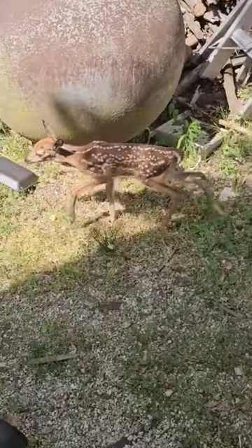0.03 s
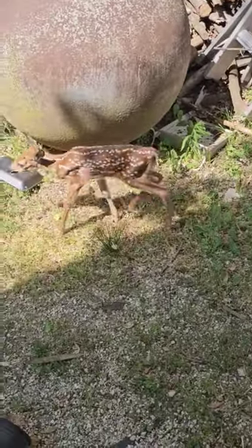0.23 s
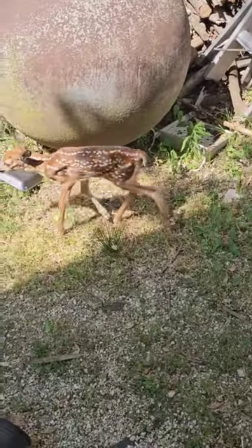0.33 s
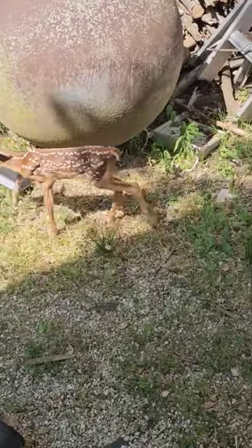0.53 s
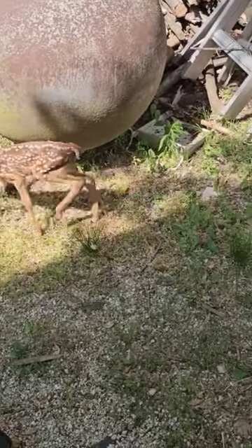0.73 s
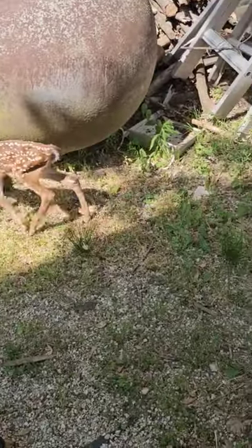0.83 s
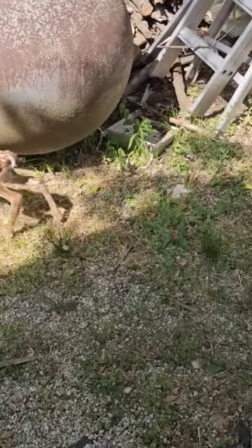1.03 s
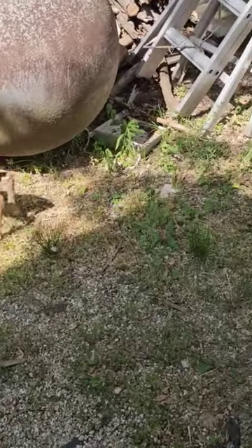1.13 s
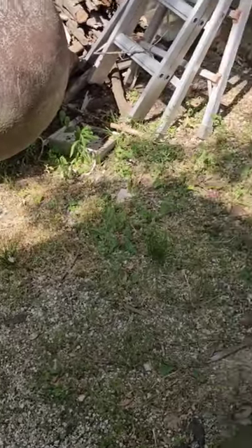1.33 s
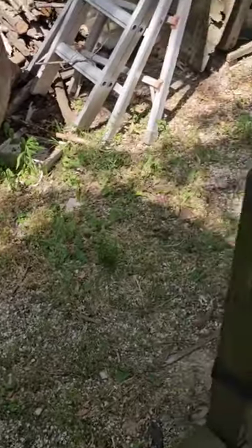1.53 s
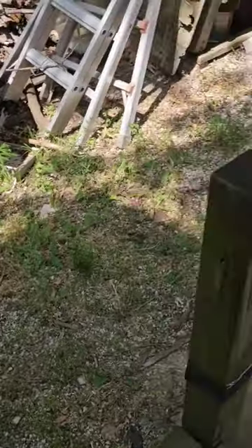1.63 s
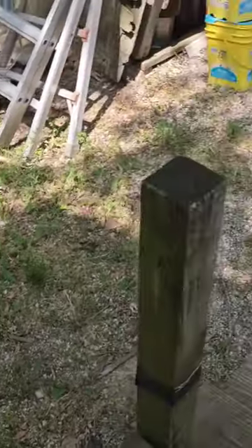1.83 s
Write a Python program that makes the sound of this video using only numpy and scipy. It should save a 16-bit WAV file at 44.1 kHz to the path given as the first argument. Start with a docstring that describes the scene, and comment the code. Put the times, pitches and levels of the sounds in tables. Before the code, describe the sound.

A fawn gives one short, high bleat in a yard, then soft bumps on the camera.

```python
"""A fawn bleats once, walking past in a yard: an arched call opening from a closed-mouth hum, made of
sine overtones and breath noise, with an echo from sheds and a tank. Close by, handling bumps on the camera
(decaying tones, short bright noise snaps) and grass brushed by feet (grainy noise swells). Farther off,
filtered noise makes rumble, air and a thin insect that fades out; gliding sines make faint bird notes.
The left microphone is mostly fuller below 2 kHz, the right brighter."""
import sys
import numpy as np
from scipy import signal
from scipy.fft import rfft, irfft, next_fast_len
from scipy.io import wavfile
from scipy.ndimage import uniform_filter1d, map_coordinates

SR = 44100
rng = np.random.default_rng(int(sys.argv[2]) if len(sys.argv) > 2 else 0)


def to_wav(s):
    """Save 16-bit WAV."""
    ch = np.atleast_2d(s).T  # columns
    pcm = np.round(np.clip(ch, -1, 1) * 32767)  # PCM
    wavfile.write(sys.argv[1], SR, pcm.astype(np.int16))


N = 83790
T = np.arange(N) / SR  # s

# Still air and distant rumble, before patchiness: f/Hz, left level/(dB per Hz), right level/(dB per Hz)
AIR_SPECTRUM = [(15, -65, -87.5), (40, -62, -66), (85.9, -63, -67), (121, -70, -84), (227, -84.5, -78),
                (305, -83, -87), (400, -99.5, -96), (560, -87, -97), (1450, -90.5, -100),
                (2200, -97.5, -100), (2960, -102.5, -102), (5700, -104, -100), (6760, -108, -102),
                (7870, -120, -116), (10300, -122, -118), (11330, -111, -108), (15700, -119, -116)]
# Left-right likeness of the air: f/Hz, likeness/(0 to 1)
AIR_LIKENESS = [(60, 0.92), (110, 1), (200, 0.86), (380, 0.25), (700, 0), (15000, 0)]
AIR_PATCHY_DB = 2.42
INSECT_HZ, INSECT_HALF_WIDTH_HZ, INSECT_FADES_S = 5352, 83, 0.91
INSECT_DB, INSECT_RIGHT_DB = -69.5, 12.5  # the second is the right channel's extra
# Faint far bird notes: t/s, length/s, start f/Hz, end f/Hz, level/dB
BIRD_NOTES = [(1.094, 0.084, 2170, 2104, -64), (1.264, 0.029, 2120, 2050, -62.5)]

# Course of the bleat: t/s, pitch f/Hz, effort level/dB, mouth opening level/dB
BLEAT_COURSE = [(0.156, 385, -55, -38), (.178, 427.3, -12, -52), (0.192, 476, -22.5, -35),
                (0.207, 538, -13, -7), (0.222, 559, -7, -10), (.232, 577.3, -1.5, 0),
                (0.251, 585.6, -7, 3.5), (0.279, 603, -1.5, 4), (0.312, 614.1, -0.5, 3),
                (0.348, 605, 2, -4.5), (0.372, 612.4, -3, 3), (0.412, 600.6, 0, -3.5),
                (0.44, 601.7, -8, 0.5), (.462, 577.7, -6.5, 0.5), (0.476, 563, -14, 0.5),
                (0.494, 536, -10.5, -13), (0.519, 488, -16.5, -18), (0.535, 446, -21.5, -4),
                (.55, 423, -48, -4)]
# Overtone strength early in the call: f/Hz, left level/dB, right level/dB
EARLY_OVERTONES = [(603, -43, -52.5), (870, -42, -38.5), (1190, -35.5, -39), (1370, -44, -47.5),
                   (1830, -50, -42), (2710, -49, -42), (2962, -35.5, -27), (3240, -47, -45.5),
                   (4120, -48.5, -34.5), (4730, -38.5, -20), (5520, -37, -29), (5473, -80.5, -25),
                   (6800, -53.5, -44.5), (7230, -53.5, -38), (7780, -57, -53.5), (8800, -70.5, -103),
                   (11550, -81, -56), (15500, -76, -100)]
# Overtone strength late in the call: f/Hz, left level/dB, right level/dB
LATE_OVERTONES = [(610, -47.5, -54), (1210, -48, -35), (1940, -49.5, -44), (2570, -52.5, -41),
                  (2970, -49.5, -38.5), (3370, -28, -24.5), (3954, -34.5, -34), (4730, -36.5, -15.5),
                  (5730, -34.5, -25.5), (6210, -43, -28.5), (6516, -57, -31), (7460, -52.5, -53),
                  (7950, -68.5, -58.5), (9600, -67, -101), (11440, -70, -56), (15500, -73, -86)]
SHIFT_S, SHIFT_TAKES_S = 0.32, 0.0358  # from the early balance to the late one
# late in the call a hollow opens in the middle overtones on the right
HOLLOW_S, HOLLOW_HZ, HOLLOW_WIDE_HZ, HOLLOW_DB = .39, 2500, 750, -9
LEFT_LATE_S = .00009  # the call reaches the right microphone first
MOUTH_OPEN_HZ = 2910  # the mouth opening acts above this
WAVER_DB = 1.5  # overtone drift, growing with overtone number
TREMBLE, TREMBLE_END = 0.002, .009  # share of pitch: throughout, and added as the call dies
# Relative spectrum of the breath under the overtones: f/Hz, left level/dB, right level/dB
BREATH_SPECTRUM = [(589, -47, -59), (2700, -46.5, -45.5), (3600, -8, -18), (4870, -11.5, 5.5),
                   (5900, -15.5, 0), (8700, -45, -41), (11800, -14.5, -9.5), (15500, -27, -25.5)]
BREATH_DB, BREATH_END_DB, DIES_S = -56, 27, .482  # the second is added as the call dies

# Echo decay in the yard: f/Hz, t60/s
YARD_DECAY = [(1200, .12), (3000, .27), (4800, .21), (6200, .3), (12000, .15)]
YARD_DB, YARD_DELAY_S = -13, .03
ECHO_FLUTTER_DB = 5  # fast random level flutter makes the echo hazy

# Low thumps of handling bumps on the camera: t/s, strength level/dB, pitch f/Hz, t60/s
BUMP_THUMPS = [(.205, -35, 62.5, 0.17), (.398, -28.5, 65, 0.071), (0.959, -35.5, 82, 0.045),
               (1.147, -23, 96.7, 0.059), (1.442, -36.5, 110, 0.037), (1.529, -26.5, 93, 0.086),
               (1.552, -31.5, 91.5, 0.031), (1.607, -29.5, 54.8, 0.13), (1.774, -36.5, 56, 0.069)]
THUMP_LEFT_DB, THUMP_RIGHT_DB, THUMP_RISE_S = 8.5, 0.5, 0.001
# Case knocks and bright snaps: t/s, case flex level/dB, case knock level/dB, snap level/dB, snap treble level/dB
KNOCKS_AND_SNAPS = [(0.353, -57, -45.5, -49, -6), (0.956, -35, -28, -39.5, 2), (1.143, -29, -67, -63, 0),
                    (1.44, -35, -31, -30.5, -7.5), (1.528, -29.5, -28, -48, -2.5),
                    (1.5552, -37, -32.5, -39.5, 8), (1.596, -37, -64, -70, 2)]
# Case flex, then two knock modes: f/Hz, t60/s, left level/dB, right level/dB, right phase lead/rad
CASE_MODES = [(228.6, 0.04, 11, 4, 4.31), (505, .016, 3, 0, 2.03), (693, 0.013, 10, -10, 1.3)]
# Relative spectrum of a snap: f/Hz, left level/dB, right level/dB
SNAP_SPECTRUM = [(500, -34.5, -23), (1100, -6, -24), (1750, -1.5, -20.5), (3120, -9.5, -22.5),
                 (4400, -9, 0), (6550, -20.5, -10.5), (9200, -35.5, -40), (12000, -40.5, -31.5),
                 (15500, -31, -39)]
SNAP_T60_S, SNAP_LATE_S, CASE_RISE_CYCLES = .009, .0005, .8

# Grass brushed by feet: t/s, length/s, level/dB, dull scuff level relative to the bright part/dB
GRASS_BRUSHES = [(0.506, 0.033, -52, -9), (0.736, 0.017, -63, -12), (0.96, 0.08, -62.5, 2),
                 (1.168, 0.046, -63, -5), (1.278, 0.041, -55.5, -28), (1.408, 0.034, -61.5, -13),
                 (1.536, 0.11, -63, 8.5), (1.696, 0.096, -59, 7.5), (1.861, 0.028, -56, -4)]
# Relative spectrum of bright grass: f/Hz, left level/dB, right level/dB
GRASS_SPECTRUM = [(200, -120, -120), (1466, 11, -44), (4107, -0.5, 6), (6460, -6.5, 10), (9250, -26, -33),
                  (11780, -6, 4), (15480, -4.5, -29)]
# Relative spectrum of the dull scuff: f/Hz, left level/dB, right level/dB
SCUFF_SPECTRUM = [(59.7, -23, -38.5), (199, 5, -3), (738.5, 2, -12), (1500, -9.5, -20),
                  (3020, -16.5, -37.5), (6030, -120, -120)]
BAND_LIMIT_HZ = 15440


def amp(db):
    """Decibels to amplitude."""
    return 10 ** (np.asarray(db) / 20)


def unit(x):
    """Scale to an RMS of one across all channels."""
    return x / np.sqrt(np.mean(x ** 2) + 1e-20)


def along(points, hz):
    """Each column after f/Hz, read on a log frequency axis."""
    f, *cols = np.transpose(points)
    return np.array([np.interp(np.log(hz + 1), np.log(f + 1), c) for c in cols])


def wobble(rate):
    """A smooth random curve with rate knots a second."""
    return map_coordinates(rng.standard_normal(int(N * rate / SR) + 4), [T * rate])


def filtered(x, response):
    """Multiply the spectrum of x by a response of frequency."""
    m = next_fast_len(N + SR // 2)
    return irfft(rfft(x, m) * response(np.fft.rfftfreq(m, 1 / SR)), m)[..., :N]


def coloured(spectrum):
    """Unrelated noise in the two channels, shaped by a spectrum."""
    return filtered(rng.standard_normal((2, N)), lambda hz: amp(along(spectrum, hz)))


def since(s):
    """Seconds since s, zero before it."""
    return np.maximum(T - s, 0)


def sigmoid(x):
    """A smooth step from 0 to 1."""
    return 1 / (1 + np.exp(-x))


def air():
    """Patchy background noise: rumble shared by both microphones, treble unrelated."""
    z = signal.stft(rng.standard_normal((2, N)), nperseg=512)[2]
    patches = uniform_filter1d(rng.standard_normal(z.shape[1:]), size=6, axis=0)
    patches = uniform_filter1d(patches, size=12, axis=1)
    left, other = signal.istft(z * amp(AIR_PATCHY_DB * unit(patches)), nperseg=512)[1][:, :N]

    def likeness(hz):
        return np.clip(along(AIR_LIKENESS, hz)[0], 0, 1)

    right = filtered(left, likeness) + filtered(other, lambda hz: np.sqrt(1 - likeness(hz) ** 2))
    # per-Hz levels to white noise of unit power
    return filtered(np.array([left, right]), lambda hz: amp(along(AIR_SPECTRUM, hz)) * np.sqrt(SR / 2))


def insect():
    """A thin noise band around one pitch, gently wavering until it fades out."""
    band = filtered(rng.standard_normal((2, N)),
                    lambda hz: 1 / (1 + ((hz - INSECT_HZ) / INSECT_HALF_WIDTH_HZ) ** 2))
    fade = sigmoid((INSECT_FADES_S - T) / 0.053)
    level_db = INSECT_DB + 1.4 * wobble(40.11) + [[0], [INSECT_RIGHT_DB]]
    return amp(level_db) * fade * unit(band)


def bleat():
    """Sine overtones on an arched pitch; the mouth opens the treble and the overtone balance shifts partway."""
    s, *cols = np.transpose(BLEAT_COURSE)
    pitch, effort_db, open_db = [uniform_filter1d(np.interp(T, s, c), size=400) for c in cols]
    dying = sigmoid((T - DIES_S) / .012)
    pitch = pitch * (1 + (TREMBLE + TREMBLE_END * dying) * wobble(89.53))
    phase = 2 * np.pi * np.cumsum(pitch) / SR
    shifted = sigmoid(4 * (T - SHIFT_S) / SHIFT_TAKES_S)
    hollow_db = HOLLOW_DB * sigmoid((T - HOLLOW_S) / .008)
    voice = np.zeros((2, N))
    for k in range(1, 27):
        hz = k * pitch
        db = (1 - shifted) * along(EARLY_OVERTONES, hz) + shifted * along(LATE_OVERTONES, hz)
        db += open_db / (1 + (MOUTH_OPEN_HZ / hz) ** 6)
        db[1] += hollow_db * np.exp(-((hz - HOLLOW_HZ) / HOLLOW_WIDE_HZ) ** 2)
        drift = np.array([wobble(25 + 3 * k), wobble(25 + 3 * k)])
        drift_db = WAVER_DB * (1 + (k / 14) ** 2) * drift
        arrival_lag = 2 * np.pi * hz * [[LEFT_LATE_S], [0]]
        overtone = np.sin(k * phase + rng.uniform(0, 2 * np.pi) - arrival_lag)
        voice += amp(db + drift_db) * np.sqrt(2) * overtone
    sounding = amp(effort_db) * (T > s[0]) * (T < s[-1])
    breath_db = BREATH_DB + open_db + BREATH_END_DB * dying
    # the breath pulses once per pitch cycle
    breath = unit(coloured(BREATH_SPECTRUM)) * amp(breath_db) * (1 + np.cos(phase))
    return sounding * (voice + breath)


def yard(x):
    """Sheds and a tank answer with a noise tail; each frequency dies at its own speed."""
    hz, t, z = signal.stft(rng.standard_normal((2, SR // 2)), SR, nperseg=256)
    tail = signal.istft(z * amp(-60 * t / along(YARD_DECAY, hz).T), SR, nperseg=256)[1]
    tail = tail / np.linalg.norm(tail[0])
    fluttering = x * amp(ECHO_FLUTTER_DB * wobble(400))
    late = np.pad(fluttering, ((0, 0), (int(YARD_DELAY_S * SR), 0)))
    return amp(YARD_DB) * signal.fftconvolve(late, tail, axes=1)[:, :N]


def bumps():
    """Handling bumps on the camera: low decaying thumps, ringing case modes and short bright noise snaps."""
    out = np.zeros((2, N))
    for s, db, hz, t60 in BUMP_THUMPS:
        t = since(s)
        level = amp(db - 60 * t / t60 + [[THUMP_LEFT_DB], [THUMP_RIGHT_DB]])
        out += level * (1 - np.exp(-t / THUMP_RISE_S)) * np.sin(2 * np.pi * hz * t)
    # snap noise partly shared by the microphones
    shared = filtered(rng.standard_normal(N), lambda hz: amp(along(SNAP_SPECTRUM, hz)))
    grit = unit(shared + 2.0 * coloured(SNAP_SPECTRUM))
    treble = filtered(grit, lambda hz: 1 / (1 + (3500 / (hz + 1)) ** 6))
    for s, flex_db, knock_db, snap_db, bright_db in KNOCKS_AND_SNAPS:
        t = since(s)
        for db, (hz, t60, left_db, right_db, lead) in zip((flex_db, knock_db, knock_db), CASE_MODES):
            ring = np.sin(2 * np.pi * hz * t + np.array([[0], [lead]]))
            rise = 1 - np.exp(-t * hz / CASE_RISE_CYCLES)
            out += amp(db - 60 * t / t60 + [[left_db], [right_db]]) * ring * rise
        snap_level = amp(snap_db - 60 * since(s + SNAP_LATE_S) / SNAP_T60_S) * (t > SNAP_LATE_S)
        out += snap_level * (grit + (amp(bright_db) - 1) * treble)
    return filtered(out, lambda hz: (1j * hz / (18 + 1j * hz)) ** 2)  # low cut at 18 Hz


def swishes():
    """Grainy noise swells of brushed grass, each mixed with some dull scuff."""
    bright, dull = unit(coloured(GRASS_SPECTRUM)), unit(coloured(SCUFF_SPECTRUM))
    grain = amp(2 * np.array([wobble(300), wobble(300)]))
    out = np.zeros((2, N))
    for s, length, db, dull_db in GRASS_BRUSHES:
        swell = np.exp(-((T - s) / (0.49 * length)) ** 2)  # centred on s
        out += amp(db) * swell * (bright + amp(dull_db) * dull)
    return grain * out


def birds():
    """Faint far notes: sines on a wavering glide, stronger on the right."""
    out = np.zeros((2, N))
    for s, length, start_hz, end_hz, db in BIRD_NOTES:
        u = np.clip((T - s) / length, 0, 1)
        hz = start_hz + (end_hz - start_hz) * u + 60 * wobble(120)
        swell = np.sqrt(np.sin(np.pi * u).clip(0))
        out += amp(db + np.array([[-8], [6]])) * swell * np.sin(2 * np.pi * np.cumsum(hz) / SR)
    return out


def scene():
    """The call and its echo over the background, with the bumps, grass and birds."""
    background = air() + insect()
    call = bleat()
    return background + call + yard(call) + bumps() + swishes() + birds()


def record(dry):
    """The camera keeps almost nothing above its steep band limit."""
    return filtered(dry, lambda hz: 1 / (1 + (hz / BAND_LIMIT_HZ) ** 200))


dry = scene()
out = record(dry)
to_wav(out)
```